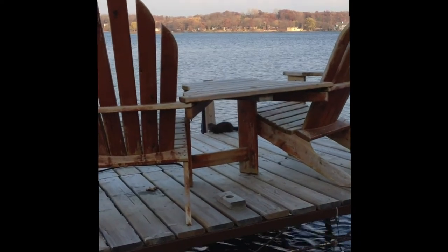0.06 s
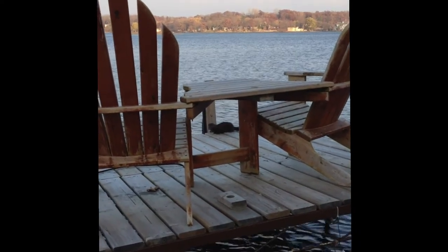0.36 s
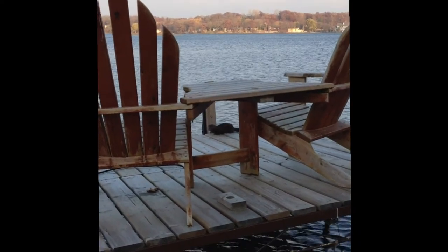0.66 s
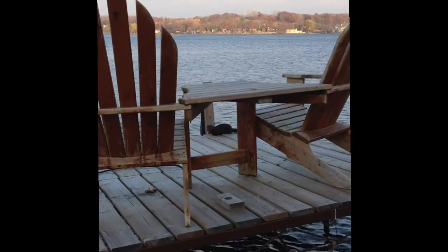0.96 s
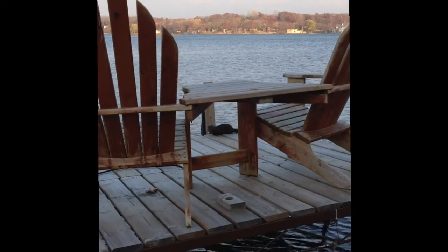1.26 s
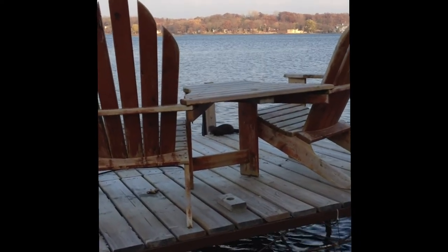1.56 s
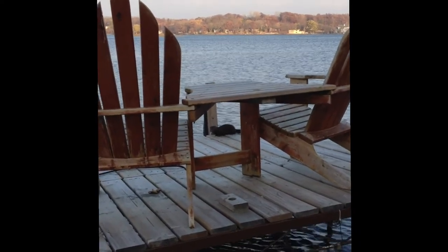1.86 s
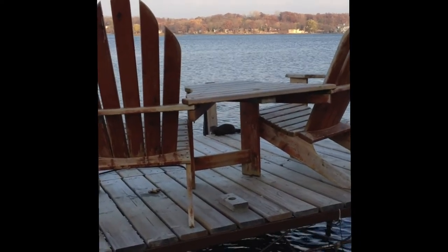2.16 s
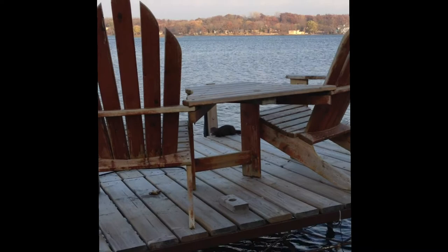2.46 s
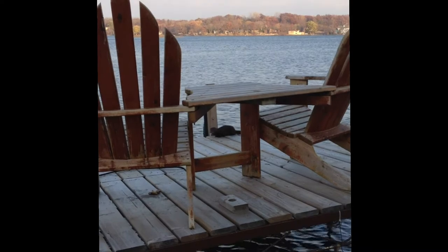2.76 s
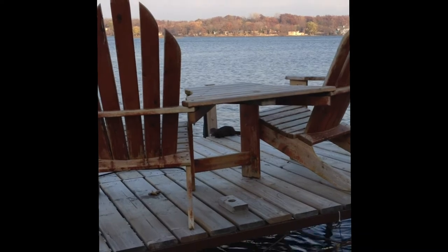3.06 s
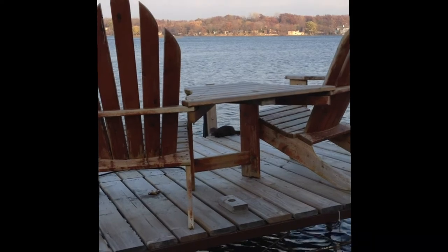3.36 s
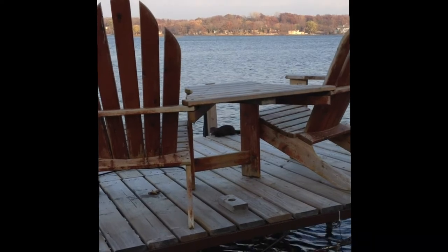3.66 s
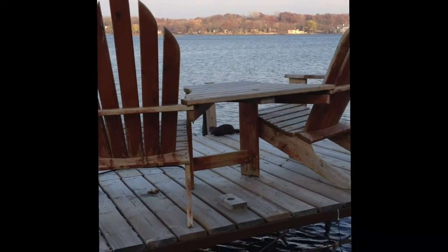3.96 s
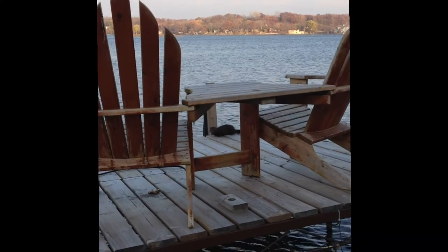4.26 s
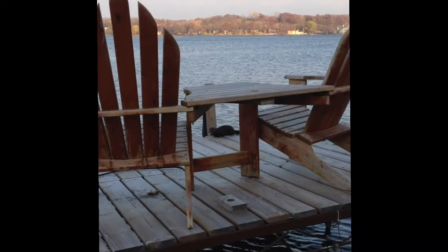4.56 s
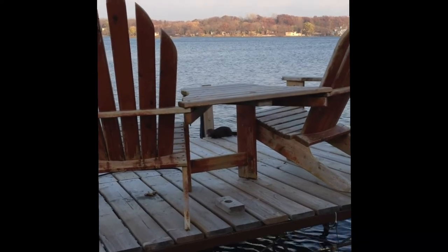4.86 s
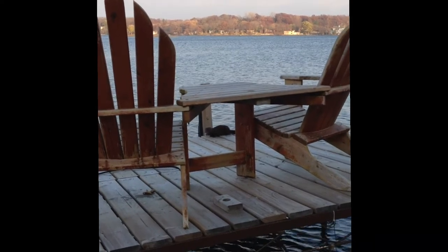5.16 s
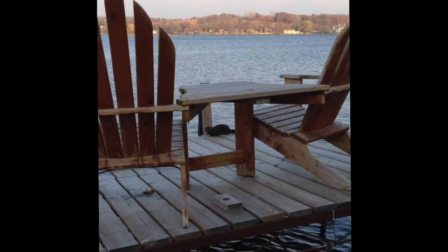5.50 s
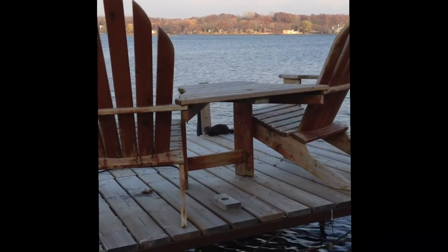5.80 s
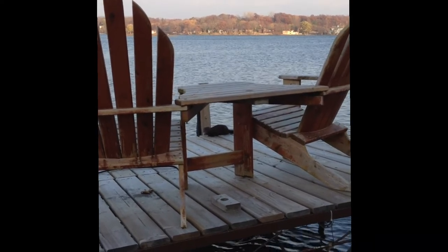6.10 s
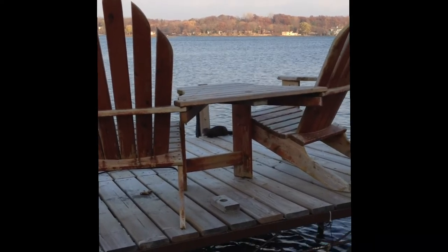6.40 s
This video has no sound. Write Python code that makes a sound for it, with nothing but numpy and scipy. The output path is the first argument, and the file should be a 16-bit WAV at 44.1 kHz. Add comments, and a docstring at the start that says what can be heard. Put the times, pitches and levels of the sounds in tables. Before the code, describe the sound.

Crows caw again and again from the far trees along a lake, faint and raspy over a soft wash of rippling water and a steady hiss. Wind bumps the microphone in low, irregular thuds, light at first and then stronger. A small bird gives one thin, high chip about halfway. Near the end the caws crowd together and the wind swells into loud buffeting.

```python
"""Crows caw from the trees along a lake shore, heard from a wooden dock; a small bird chips once.
Each caw is a rough pulse train from the syrinx, filtered by the resonances of throat, mouth and beak.
A rising breeze buffets the microphone: each eddy is a brief pressure pulse that rings its bass filter.
Under it all lie the soft wash of rippling water and a steady hiss."""
import sys
import numpy as np
from scipy import signal
from scipy.fft import rfft, irfft
from scipy.io import wavfile
from scipy.ndimage import uniform_filter1d

SR = 44100
rng = np.random.default_rng(int(sys.argv[2]) if len(sys.argv) > 2 else 0)


def put_to_file(sound):
    """Save the sound as 16-bit audio at rate SR, in the file named by the first command-line argument."""
    columns = np.atleast_2d(sound).T  # one column per channel
    safe = np.clip(columns, -1, 1)
    whole_steps = np.round(safe * 32767)
    wavfile.write(sys.argv[1], SR, whole_steps.astype(np.int16))


N = 288255
TIME = np.arange(N) / SR


def crows():
    """Superposition: caws follow one another, then overlap as several birds call together."""
    # calls: (start [s], end [s], top pitch [Hz], final pitch [Hz], level [dB], rasp [0-1],
    # throat gain [dB], beak gain [dB])
    calls = [ (-.14, 0.096, 565, 487, -59.5, 0.42, 3, -12), (0.264, 0.534, 606, 563, -59, 0.23, 4, 5),
             (0.819, 1.033, 644, 532, -60, 0.4, 8, 3), (1.362, 1.712, 609, 499, -62, 0.3, 7.5, 0),
             (2.017, 2.3, 633, 494, -60, 0.58, 4, 1), (2.586, 2.859, 592, 473, -60, 0.4, 4.5, -3),
             (3.057, 3.34, 644.4, 465, -56.5, 0.43, 8, -2), (4.308, 4.616, 609, 471, -59, 0.46, 0, -4),
             (4.87, 5.065, 577, 519, -57, 0.38, -2, -8),
             (5.279, 5.65, 598.4, 489.7, -54.5, 0.76, 2.5, -5.5),
             (5.648, 5.879, 571, 523, -57.5, .35, -5, 1), (5.875, 6.064, 609, 507, -55.5, 0.55, 7, 3.5),
             (6.025, 6.227, 554, 503, -55, 0.62, 0.5, -1.5), (6.424, 6.712, 622, 504, -58.5, 0.64, -2, -1),
             ]
    out = np.zeros(N)
    for start, end, top_hz, end_hz, db, rasp, throat_db, beak_db in calls:
        add(out, start, undb(db) * caw(end - start, top_hz, end_hz, rasp, throat_db, beak_db))
    return out


def caw(length, top_hz, end_hz, rasp, throat_db, beak_db, mouth_hz=1520):
    """Source and filter: a pitch that leaps and sags excites the resonances of the vocal tract."""
    # beak resonances: (centre [Hz], width [Hz], relative gain [dB])
    beak_modes = [(2600, 1600, -26.5), (3480, 270, -6), (4800, 600, -11.5), (5600, 1700, -14)]
    along = np.linspace(0, 1, int(length * SR))
    hz = np.interp(along, [0, .17, .38, 1], [.87 * top_hz, top_hz, .98 * top_hz, end_hz])
    source = syrinx(hz, rasp)
    # as the bill closes, the mouth follows the third harmonic halfway and takes over from the throat
    mouth = glide(source, (3 * hz + mouth_hz) / 2, width_hz=500)
    mouth *= np.interp(along, [0, .6, 1], [.8, 1.1, 1.25])
    throat = resonate(source, hz=1290, width_hz=260) * np.interp(along, [0, .4, 1], [1, 1, .2])
    beak = sum(undb(db) * resonate(source, centre, width) for centre, width, db in beak_modes)
    # harsh calls fill the gap above the mouth resonance
    snarl = rasp ** 2 * undb(-8) * resonate(source, hz=2750, width_hz=890)
    effort = np.interp(along, [0, .07, .55, .92, 1], [0, .95, 1, .7, 0])
    return unit((mouth + snarl + undb(throat_db) * throat + undb(beak_db) * beak) * effort)


def syrinx(hz, rasp, flutter_hz=72):
    """Modulation roughens a harmonic pulse train; rasp adds jitter, hiss and a stronger third cycle."""
    size = len(hz)
    jitter = 1 + .075 * rasp * wander(330, size)
    phase = phase_of(hz * jitter)
    pulses = unit(sum(np.cos(k * phase) for k in range(1, 15)))
    subharmonic = 1 + 1.3 * rasp * np.cos(phase / 3 + .6 * wander(60, size))
    flutter = 1 + .7 * np.cos(phase_of(flutter_hz * (1 + .2 * wander(60, size))))
    hiss = .8 * rasp * rng.standard_normal(N)[:size]
    return (pulses * subharmonic + hiss) * flutter


def buffets(trim_db=-.86, scatter_db=2.5, swarm_s=.02984, fade_db_per_s=379.5, count=6):
    """Impulse excitation: each hard eddy thuds amid a swarm of weaker ones; narrow ones are brighter."""
    # hardest eddies: (time [s], peak level before trim [dB], half-width [ms])
    thuds = [(0.071, -42.5, 1.9), (0.101, -39, 3), (0.847, -36, 1.9), (.948, -30, 1.9), (1.01, -28, 1.6),
             (1.471, -30.5, 1.7), (1.542, -42.5, 2.7), (2.782, -27.5, 2.35), (2.852, -28, 0.84),
             (2.98, -20.5, 0.89), (3.015, -19.5, 1.03), (3.06, -26, 1.1), (3.1, -29.5, 1.7),
             (3.406, -24, 2.75), (3.435, -28, 2), (3.468, -30.5, 1.8), (3.587, -22.5, 1.14),
             (3.655, -29, 0.98), (4.115, -20, 0.85), (4.169, -22, .7), (4.195, -17.5, 1.14),
             (4.303, -21.5, 2.15), (4.387, -21, 1.17), (4.86, -31.5, 1.8), (5.14, -24.5, 1.6),
             (5.194, -10.5, 0.76), (5.203, -18.5, 0.35), (5.253, -15, 1.33), (5.328, -16.5, 2.1),
             (5.411, -23.5, 0.72), (5.476, -28, 1.82), (5.58, -23, 2.3), (5.785, -18.5, 1.95),
             (5.832, -23, 1.9), (5.868, -19, 1.65), (5.92, -14.5, 0.98), (6.0, -17.5, 0.74),
             (6.041, -12, 1.44), (6.086, -14.5, 1.1), (6.121, -5.5, 0.82), (6.163, -17, 0.56),
             (6.202, -5, 0.78), (6.231, -9, 0.79), (6.294, -13, 0.33), (6.317, -6.5, 0.52),
             (6.384, -10.5, 0.47), (6.415, -7.5, 0.47), (6.458, -6, 1.2), (6.521, -26.5, 2.4)]
    out = np.zeros(N)
    for time, peak_db, half_ms in thuds:
        offsets = swarm_s * ((np.arange(count) + rng.random(count)) / count - .5)
        swarm_db = -7 - fade_db_per_s * np.abs(offsets) + scatter_db * rng.standard_normal(count)
        widths = half_ms * np.r_[1, np.full(count, 1.085)]
        pulses = eddies(time + np.r_[0, offsets], widths, rng.random(count + 1))
        for (start, pulse), db in zip(pulses, np.r_[0, swarm_db]):
            add(out, start, undb(peak_db + trim_db + db) * pulse)
    return out


def turbulence(trim_db=-.47, scatter_db=4, swell_db=7, count=1400):
    """Shot noise: weak eddies, uneven in timing, size and width, fill gusts that swell and sag."""
    # gusts: (start [s], length [s], crest position [0-1], typical crest level before trim [dB],
    # typical eddy half-width [ms])
    gusts = [(0.919, 0.17, 0.48, -38.5, 2.02), (2.779, 0.11, 0.74, -38, 1.95),
             (2.914, 0.22, 0.25, -32, 1.55), (3.37, 0.089, 0.56, -35.5, 2), (3.517, 0.27, 0.61, -35, 1.8),
             (4.091, 0.15, 0.43, -33.5, 1.35), (4.221, 0.24, 0.85, -36.5, 1.82),
             (4.49, 0.3, 0.071, -50, 2.9), (4.845, .13, 0.68, -41, 2.5), (5.113, 0.169, 0.7, -28, 1.6),
             (5.284, 0.15, 0.53, -31.5, 1.9), (5.717, .23, 0.79, -28.5, 1.86),
             (5.965, 0.56, 0.58, -22.5, 1.07)]
    slots, spreads, turns = rng.random((count, 3)).T
    times = (np.arange(count) + slots) / count * N / SR
    sizes = undb(trim_db + scatter_db * rng.standard_normal(count))
    widths = np.exp(.63 * (spreads - .5))
    out = np.zeros(N)
    for onset, length, crest, db, half_ms in gusts:
        age = times - onset
        sag_db = np.interp(age / length, [0, crest, 1], [swell_db, 0, swell_db])
        force = sizes * undb(db - sag_db) * envelope(age, length, attack_s=.01, release_s=.018)
        blowing = force > 0
        pulses = eddies(times[blowing], half_ms * widths[blowing], turns[blowing])
        for (start, pulse), size in zip(pulses, force[blowing]):
            add(out, start, size * pulse)
    return out


def eddies(times, half_ms, turns, port_hz=840, bass_cut_hz=167.5):
    """Transient response: pressure pulses, softened by the microphone's port, ring its bass filter."""
    t = np.arange(-600, 1800) / SR
    fade = signal.windows.tukey(len(t), .4)
    # the phase, in turns, sets how lopsided each pulse is
    pulses = fade * np.exp(2j * np.pi * turns[:, None]) / (1 - 1000j * t / half_ms[:, None])
    softened = signal.sosfilt(signal.butter(2, port_hz, fs=SR, output="sos"), pulses)
    ringing = fade * signal.sosfilt(signal.butter(4, bass_cut_hz, "high", fs=SR, output="sos"), softened)
    magnitude = np.abs(ringing)
    starts = times - magnitude.argmax(axis=1) / SR
    return zip(starts, ringing.real / magnitude.max(axis=1, keepdims=True))


def small_bird(high_hz=8350, low_hz=6580, swoop_s=.047, rise_hz_per_s=6000):
    """Frequency modulation: a thin whistle swells as it swoops down, then creeps up as it fades."""
    # a faint lead-in and the full note: (start [s], length [s], level at the swoop's foot [dB])
    notes = [(3.404, .045, -61), (3.458, .16, -55.5)]
    swell_db_per_s, fade_db_per_s = 220, 130
    out = np.zeros(N)
    for start, length, db in notes:
        t = TIME[:int(length * SR)]
        before, after = np.maximum(swoop_s - t, 0), np.maximum(t - swoop_s, 0)
        swoop = np.sin(np.pi / 2 * before / swoop_s) ** 2
        hz = low_hz + (high_hz - low_hz) * swoop + rise_hz_per_s * after
        hz *= 1 + .0208 * wander(590, len(t))
        gain = undb(db - swell_db_per_s * before - fade_db_per_s * after)
        gain *= envelope(t, length, attack_s=.0048, release_s=.0048)
        add(out, start, np.sqrt(2) * gain * np.sin(phase_of(hz)))
    return out


def shore(x, wet_db=-7, t60_s=.5):
    """Reverberation: trunks and house fronts scatter the calls into a short, dull tail."""
    tail = colour(rng.standard_normal(SR), [(1500, 0), (8000, -5)]) * undb(-60 * TIME[:SR] / t60_s)
    tail /= np.sqrt(np.sum(tail ** 2))
    return x + undb(wet_db) * signal.fftconvolve(x, tail)[:N]


def ticks(decay_s=.003):
    """Damped resonance: brief noise bursts in a broad band are heard as tiny dry ticks."""
    # faint ticks around the chip: (time [s], centre [Hz], peak level [dB])
    bursts = [(3.405, 5000, -52), (3.421, 2550, -49), (3.443, 3600, -52), (3.457, 3800, -50),
              (3.484, 2500, -52)]
    out, t = np.zeros(N), TIME[:1024]
    for start, hz, db in bursts:
        tick = resonate(rng.standard_normal(len(t)) * np.exp(-t / decay_s), hz, width_hz=1400)
        add(out, start, undb(db) * tick / np.abs(tick).max())
    return out


def lake(flicker_db=.7):
    """Modulated noise: ripples wash the shore, each band flickering on its own, under a smooth hiss."""
    # spectrum of the ripples: (frequency [Hz], relative level [dB])
    wash_spectrum = [(24, -66), (40, -30), (136, 3), (250, -0.5), (288, -1.5), (325, -2), (461, -2),
                     (521, -4.5), (569, -3.5), (961, -3), (1590, -8), (2600, -23), (3380, -50),
                     (5720, -120)]
    # spectrum of the hiss: (frequency [Hz], relative level [dB])
    hiss_spectrum = [(1350, -28.5), (2300, -0.5), (2430, -1), (2700, -0.5), (3060, -0.5), (3340, -0.5),
                     (4670, 0.5), (5050, -2.5), (5690, -1), (7820, -0.5), (10000, -13), (14700, -12.5),
                     (15400, -12)]
    # slow drift of the background: (time [s], wash level [dB], hiss level [dB])
    levels = [(0, -55.5, -61.5), (1.5, -54.5, -60), (2.6, -55, -61.5), (4.3, -56, -63), (6.54, -54, -62.5)]
    times, wash_db, hiss_db = np.transpose(levels)
    edges_hz = [20, 200, 350, 550, 800, 1100, 1400, 1800, 6000]
    water = rfft(colour(rng.standard_normal(N), wash_spectrum))
    f = np.fft.rfftfreq(N, 1 / SR)
    bands = (irfft(water * (f >= lo) * (f < hi), N) for lo, hi in zip(edges_hz, edges_hz[1:]))
    wash = unit(sum(band * undb(flicker_db * wander(16)) for band in bands))
    hiss = unit(colour(rng.standard_normal(N), hiss_spectrum))
    return wash * undb(np.interp(TIME, times, wash_db)) + hiss * undb(np.interp(TIME, times, hiss_db))


def resonate(x, hz, width_hz):
    """Cascaded resonance: two passes steepen the skirts."""
    b, a = signal.iirpeak(hz, hz / width_hz, fs=SR)
    return signal.lfilter(b, a, signal.lfilter(b, a, x))


def glide(x, hz, width_hz):
    """Heterodyning: shifting down, low-passing and shifting back makes a moving resonance."""
    carrier = np.exp(1j * phase_of(hz))
    lowpass = signal.butter(2, width_hz / 2, fs=SR, output="sos")
    return 2 * (carrier * signal.sosfilt(lowpass, x / carrier)).real


def colour(x, points):
    """Spectral shaping by (frequency [Hz], gain [dB]) points."""
    hz, db = np.transpose(points)
    f = np.maximum(np.fft.rfftfreq(len(x), 1 / SR), 1)
    return irfft(rfft(x) * undb(np.interp(np.log(f), np.log(hz), db)), len(x))


def wander(rate_hz, size=N):
    """A moving average smooths random steps into a drift with spread 1."""
    hold = max(int(SR / rate_hz), 2)
    steps = np.repeat(rng.standard_normal(N // hold + 1), hold)[:N]
    return 1.23 * uniform_filter1d(steps, hold)[:size]


def phase_of(hz):
    """Phase, in radians, is the integral of frequency."""
    return 2 * np.pi * np.cumsum(hz) / SR


def envelope(t, length, attack_s, release_s):
    """Trapezoidal envelope: attack, hold and release, silent outside."""
    return np.clip(np.minimum(t / attack_s, (length - t) / release_s), 0, 1)


def undb(db):
    """Decibels to amplitude ratio."""
    return 10 ** (np.asarray(db) / 20)


def unit(x):
    """Normalisation to rms 1."""
    return x / np.sqrt(np.mean(x ** 2))


def add(out, start, sound):
    """Superpose a sound at a start time, trimmed to the scene."""
    i = int(round(start * SR))
    lo, hi = max(i, 0), min(i + len(sound), N)
    if hi > lo:
        out[lo:hi] += sound[lo - i:hi - i]


def scene():
    """Pressures add: distant birds over the lake, wind right at the microphone."""
    return (shore(crows() + small_bird()) + ticks() + lake() + buffets() + turbulence())[None]


def record(dry, top_hz=15350):
    """Band limiting: an elliptic low-pass cuts the top steeply."""
    return signal.sosfilt(signal.ellip(12, .1, 90, top_hz, fs=SR, output="sos"), dry)


dry = scene()
out = record(dry)
put_to_file(out)
```